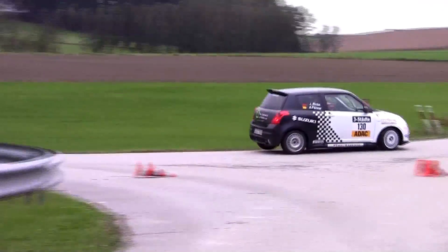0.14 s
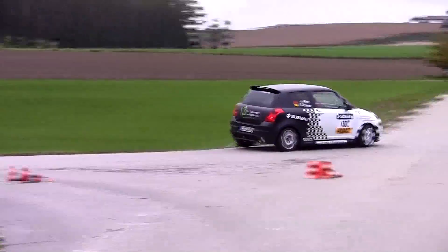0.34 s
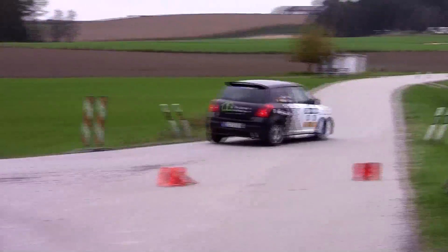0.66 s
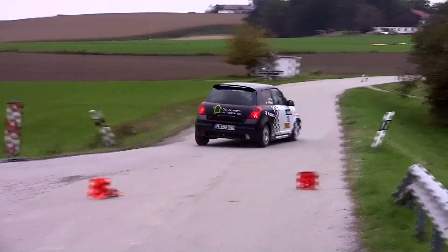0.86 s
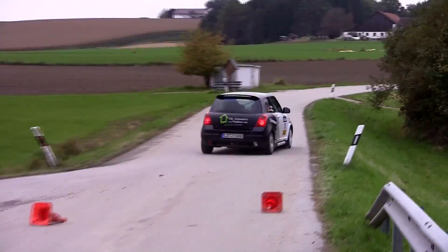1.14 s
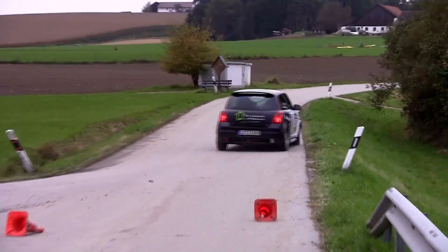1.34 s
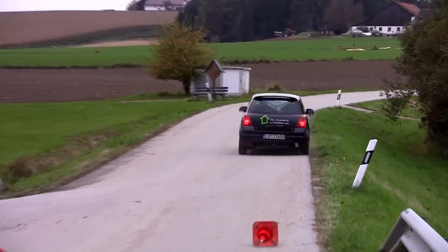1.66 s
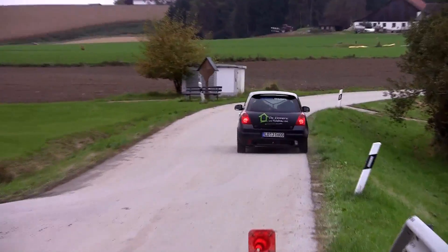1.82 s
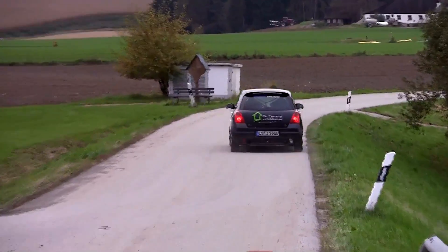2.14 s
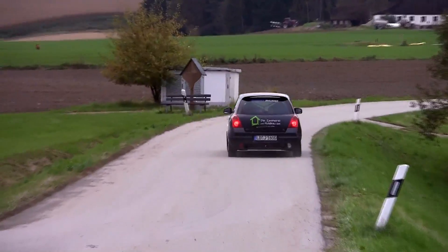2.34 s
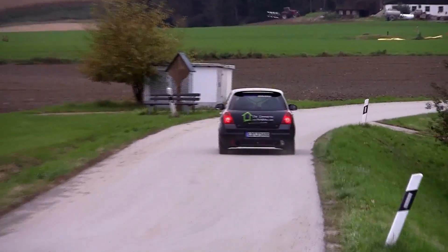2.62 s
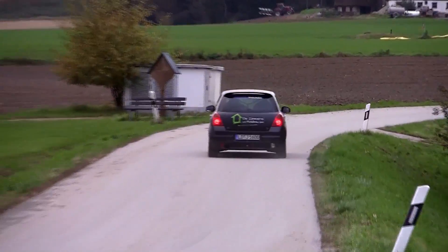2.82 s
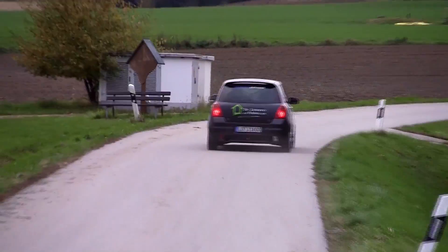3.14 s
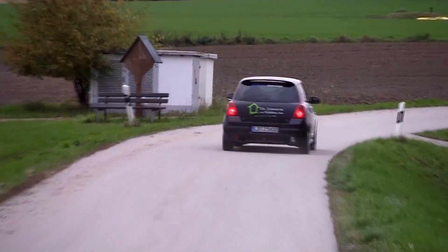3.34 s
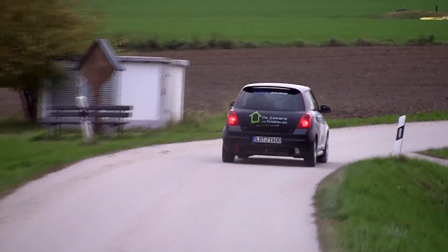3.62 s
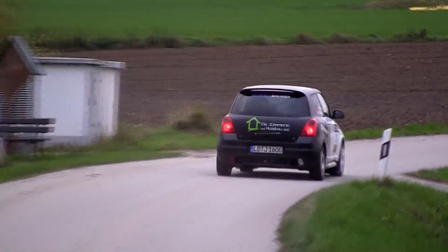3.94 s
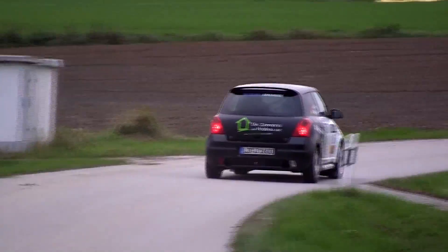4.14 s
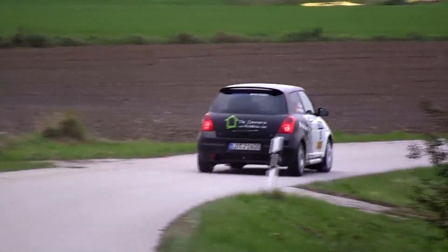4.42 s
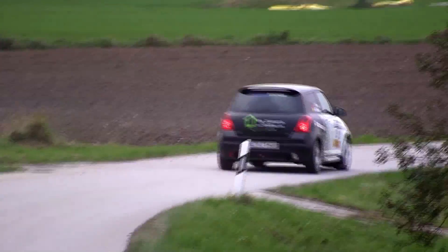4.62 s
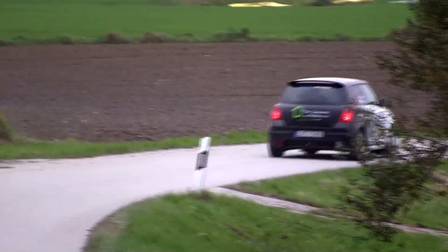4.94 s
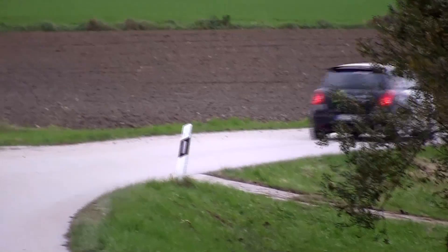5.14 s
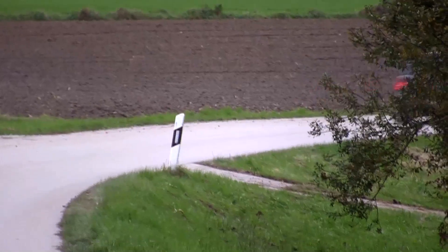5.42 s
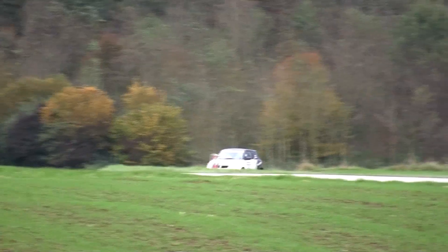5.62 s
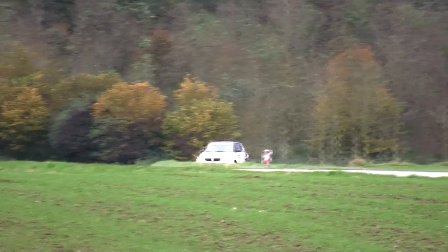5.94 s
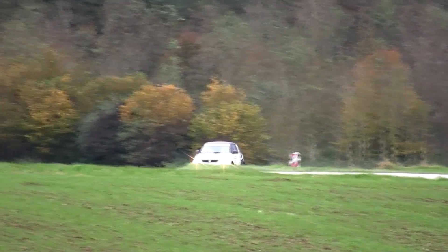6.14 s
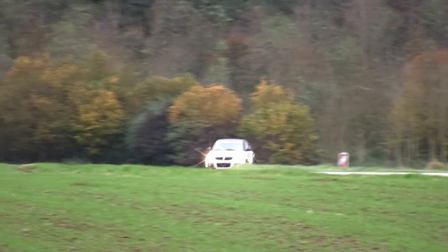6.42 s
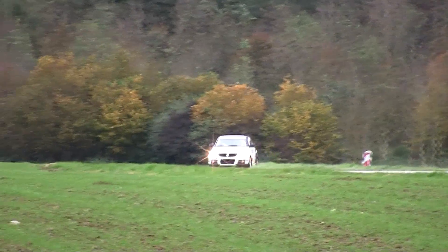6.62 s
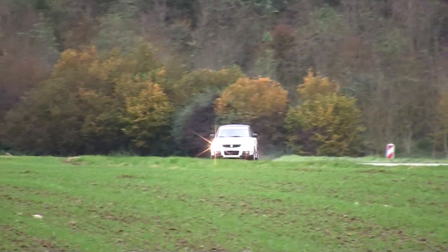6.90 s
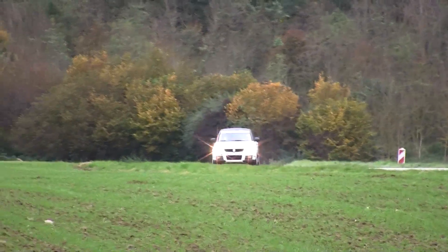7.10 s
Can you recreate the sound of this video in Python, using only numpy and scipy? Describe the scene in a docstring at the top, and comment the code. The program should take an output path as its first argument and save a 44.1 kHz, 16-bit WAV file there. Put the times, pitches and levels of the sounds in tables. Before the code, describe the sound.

A small rally car scrubs through a bend over gravel, then accelerates away in one gear with a raspy roar, before cutting to a quiet field hum.

```python
"""A junction seen from the verge: a small four-cylinder rally car pulls away in one gear.
Firing orders ring through exhaust resonances, with rasp, uneven cylinders and puffed gas noise.
Shaped noise makes the tyres, gravel and wind; short noise cracks are stones flung by the tyres.
The scene then changes to a quiet field: another car far away, a steady hum, low wavering and
sinking tones, all made of sines, over a bed of road noise and air."""
import sys
import numpy as np
from scipy import signal
from scipy.fft import rfft, irfft, next_fast_len
from scipy.io import wavfile
from scipy.ndimage import uniform_filter1d, minimum_filter1d, map_coordinates

SR = 44100
rng = np.random.default_rng(int(sys.argv[2]) if len(sys.argv) > 2 else 0)


def dump(signal):
    """Clip the signal to [-1, 1] and save it as 16-bit WAV at the path in sys.argv[1]."""
    limited = np.clip(np.atleast_2d(signal).T, -1, 1)
    pcm = np.round(limited * 32767).astype(np.int16)
    wavfile.write(sys.argv[1], SR, pcm)


N = 320607

# Noise spectra, by relative density: [frequency_hz, density_db]
FIELD_SPECTRUM = [(15, -34), (60, -12.5), (150, -8), (210, -9), (330, -21.5), (480, -20.5), (680, -16),
                  (1050, -18.5), (1550, -23.5), (2100, -32), (3100, -28.5), (4800, -40), (7700, -47.5),
                  (15800, -53.5)]  # far road noise and air
WIND_SPECTRUM = [(15, -0.5), (30, -16), (80, -2.5), (130, 1), (250, -38)]
TYRE_SPECTRUM = [(700, -22), (1500, 1), (2100, -3), (2650, 1.5), (3300, -7.5), (4600, -9), (6000, -13.5),
                 (7700, -21.5), (9300, -22), (11200, -31), (15800, -39.5)]
GRAVEL_SPECTRUM = [(150, -18.5), (500, -4.5), (1000, -8), (1900, -6.5), (3100, -13), (4800, -22),
                   (6500, -24.5), (7700, -35.5), (9500, -36.5), (15800, -45)]
SQUEAL_SPECTRUM = [(2300, -27), (2550, -3.5), (2750, 2), (3000, -18.5), (4300, -18.5), (4650, -4),
                   (5100, -23.5)]
GAS_SPECTRUM = [(30, -46.5), (80, -33), (130, -6.5), (220, -5.5), (550, 0), (900, -7), (1400, -10.5),
                (2200, -17), (3200, -27.5), (6000, -48.5)]

# Tones over the field: [start_s, pitch_hz, level_db]
HUM = [(5.62, 96.5, -41), (7.27, 100.3, -39)]
DRONE = [(5.8, 199, -58), (5.85, 201, -37.5), (6.5, 207.4, -32), (7.27, 211.5, -40)]  # wavers
SINKING_TONE = [(5.62, 252, -38), (5.72, 242.2, -39), (5.8, 228.3, -32), (5.9, 217, -47), (5.97, 201, -60)]
# Far engine: [start_s, firing_hz, level_db]
FAR_ENGINE = [(5.62, 226.6, -40.5), (5.8, 224, -48.5), (6.25, 236.1, -43), (6.5, 227.6, -48.5),
              (6.95, 237.4, -47), (7.27, 240.5, -51)]
# Balance of the far engine's firing orders: [order, relative_db]
FAR_ORDERS = [(1, 0), (2, -9.5), (3, -7.5), (4, -6), (5, -6), (6, -14.5)]

# Wind on the microphone: [start_s, level_db]
WIND_LEVEL = [(0, -52), (.33, -51), (.53, -63), (1.4, -52.5), (2.38, -50), (2.68, -63), (3.63, -54.5),
              (3.85, -49), (3.98, -45), (4.6, -38), (5.13, -36.5), (5.62, -34.5)]
# Tyres rolling: [start_s, level_db]
ROLLING_LEVEL = [(0, -43.5), (.4, -46.5), (.85, -52), (1.1, -54), (1.46, -48), (1.85, -41.5), (2.63, -42),
                 (3.1, -46), (3.64, -46.5), (4.33, -36), (4.7, -40), (5.11, -42.5), (5.6, -38.5)]
# Swells, where rise and fall each count 30 dB: [full_s, rise_s, hold_s, fall_s, level_db]
SCRUB_SWELLS = [(.19, .5, .14, .06, -32), (.47, .12, .27, .17, -35), (.92, .2, .03, .18, -33.5)]  # tyres scrubbing in the bend
GRAVEL_SWELL = (.198, .015, .062, .08, -14.5)  # a wheel crunches over loose gravel
SQUEAL_SWELL = (.875, .035, .095, .035, -39)  # a tyre half squeals as it grips

# Loudest stones, before the band gains: [start_s, dull_db, bright_db]
LOUD_STONES = [(.3972, -32.5, -49), (.4285, -25, -48.5), (.4338, -28, -47), (1.7433, -24, -42),
               (1.781, -24, -53.5), (1.8124, -31.5, -44.5), (1.8937, -26.5, -39), (1.941, -26, -46.5),
               (1.9746, -35.5, -35.5), (2.0578, -26.5, -46), (2.0934, -38.5, -41), (2.1889, -31.5, -41),
               (2.2623, -30.5, -39), (2.3556, -31.5, -44.5), (2.4413, -28, -53), (2.5616, -34.5, -55),
               (3.1532, -32.5, -49), (3.1978, -32.5, -44), (3.3544, -31.5, -51), (3.3787, -27, -49.5),
               (3.4012, -33.5, -53.5), (4.118, -27.5, -49.5), (4.4813, -29.5, -43.5), (5.1129, -15, -21.5),
               (5.3427, -34, -54), (5.4587, -28.5, -47.5)]
# Small stones at random, before the band gains: [start_s, end_s, dull_db, bright_db]
STONE_SHOWERS = [(1.663, 1.916, -29, -48), (5.245, 5.596, -35, -56.5)]

# Engine speed, surging twice as the tyres slip and grip, then climbing: [start_s, firing_hz]
REVS = [(0.0, 118.8), (0.06, 115.6), (0.23, 117.1), (0.31, 126.6), (0.42, 135.5), (0.5, 125.6),
        (0.51, 125.5), (0.59, 135.4), (0.66, 128.2), (0.72, 126), (0.8, 125.8), (1.03, 120.5),
        (1.22, 121.6), (1.49, 125.8), (1.6, 128.2), (2.24, 135.7), (3.43, 154.6), (4.54, 173),
        (5.53, 187.8), (5.62, 190.5)]
# Exhaust note: [start_s, level_db, slope above 700 Hz db_per_octave, extra lowest-order level_db]
NOTE = [(0, -9, 1, 20), (.2, -4.5, 3, 18), (.225, -13, 8, 11), (.265, 3, 15, -7), (.42, 4.5, 11, -4),
        (.5, 2, 9.5, -8.5), (.6, 4.5, 5.5, -4), (.8, 2.5, -2, -8), (1.05, -2.5, 7, 1), (1.27, -2, 8.5, -1),
        (1.6, 4.5, -1, -5.5), (2, 4.5, -16, -1), (2.3, 4.5, 0.5, 6), (2.7, 4.5, -1, 5), (3.1, 4.5, -7, 1.5),
        (3.5, 1, -1.5, 2), (3.9, 1.5, 3.5, 2), (4.2, -2.5, 11, 8), (4.5, 1.5, 4.5, 4), (4.8, 0, 3.5, 7.5),
        (5.1, -5.5, 6, 9), (5.35, -0.5, 13.5, 2), (5.62, -5, 19.5, 5.5)]
# Exhaust resonances as heard on the verge: [centre_hz, width_hz, near_db, far_db]
PIPE_MODES = [(127.4, 14.4, -13, -21.5), (195.2, 32.9, 4.5, -12), (265, 24, -27.5, -5.5),
              (343.7, 35.0, -11, -18.5), (477.3, 52.4, -16.5, -11), (543, 11, -33.0, -5.5),
              (594.5, 71.0, -15.5, -12), (702, 89.5, -21, -19.5), (850.7, 87, -31.5, -33),
              (951, 72, -30.5, -43), (1098, 89, -39, -37.5), (1170, 25, -40.5, -33),
              (1268, 112, -43.5, -46), (1430, 86, -67, -69)]
# A resonance that sings on and off: [start_s, centre_hz, level_db]
SINGING = [(0, 1400, -47), (.25, 1390, -44), (.42, 1450, -28), (.5, 1400, -43), (.6, 1430, -30),
           (.8, 1263, -37.5), (1.3, 1248, -41), (1.8, 1194, -34.5), (2.2, 1219, -25), (2.7, 1235, -32),
           (3.1, 1220, -29.5), (3.4, 1092, -30), (3.8, 1254, -33), (4.1, 1158, -33.5), (4.5, 1223, -43.5),
           (5.3, 1114, -32)]
# Harsh exhaust parts: [start_s, lower_rasp_db, upper_rasp_db, gas_roar_db, unevenness_db]
HARSH = [(0, -47, -47, -25.5, -44), (.17, -46, -41, -21.5, -33), (.41, -29.5, -53, -27, -53),
         (.6, -35, -41, -27, -50), (.84, -50, -51, -29.5, -50), (.91, -43, -45, -28.5, -48),
         (1.2, -47, -52, -35, -53), (1.9, -37.5, -43, -32, -40.5), (2.15, -39, -43, -28, -37),
         (2.3, -46, -32, -28.5, -40), (2.85, -33.5, -28.5, -26, -41.5), (3.25, -49.5, -41.5, -29, -35),
         (3.7, -34, -40.5, -25.5, -35.5), (4.3, -39.5, -43, -22.5, -25), (4.75, -38, -38, -28, -30),
         (4.9, -37.5, -38, -24, -31.5), (5.2, -30.5, -39.5, -24.5, -37.5), (5.62, -33, -41, -23.5, -47)]
# Tailpipe resonances behind the rasp: [centre_hz, width_hz]
RASP_MODES = [(1720, 260), (2060, 260), (2800, 800)]
# Highest rasp resonance against the middle one: [start_s, relative_db]
TOP_RASP = [(0, -16), (2, -30), (3.1, -30), (4, -10), (5.62, -5)]
# Unevenness of the cylinders: [shaft_order, relative_db]
UNEVEN_ORDERS = [(1, -21.5), (3, 0), (5, -6.5), (7, -6), (9, -19.5), (11, -27.5), (13, -27.5), (15, -18),
                 (17, -31), (19, -30)]
# Pulse shape, changing early on: [start_s, phase_rad, spread_cycles]
PULSE_SMEAR = [(0, .4, .7), (.21, .4, .7), (.25, 2.4, .37), (.9, 2.4, .38), (1.4, 2.1, .4)]
# Air between car and verge shaking the top orders; also scales their flicker: [start_s, blur_rad]
AIR_BLUR = [(0, .15), (3.2, .2), (4, .6), (5.6, .8)]

CHANGE_S, FADE_S = 5.624, .006  # the place has changed by CHANGE_S
TOP_HZ = 15800
STONE_T60_S, STONE_ATTACK_S = 0.018, 0.00089
FAR_S = 5.6  # the car takes this long to go from near to far
SING_WIDTH_HZ = 300
FADING_DB_PER_ORDER, FLICKER_DB_PER_ORDER = .24, .45  # higher orders waver and flicker more


def amp(db):
    """Gain of a level in dB."""
    return 10 ** (np.asarray(db) / 20)


def unit(x):
    """x at rms 1."""
    return x / np.sqrt(np.mean(x ** 2) + 1e-20)


def curves(rows):
    """One value per sample for each column after the time."""
    s, *columns = np.transpose(rows)
    return [np.interp(np.arange(N) / SR, s, column) for column in columns]


def wobble(rate):
    """A smooth random curve, rate knots a second."""
    knots = rng.standard_normal(int(N * rate / SR) + 4)
    return map_coordinates(knots, [np.arange(N) * rate / SR])


def filtered(x, response):
    """x times a response of frequency."""
    size = next_fast_len(N + 8192)
    return irfft(rfft(x, size) * response(np.fft.rfftfreq(size, 1 / SR)), size)[:N]


def rush(spectrum, patchy_db):
    """Noise of rms 1 whose time-frequency patches have random gain."""
    grains = signal.stft(rng.standard_normal(N), nperseg=512)[2]
    patches = uniform_filter1d(rng.standard_normal(grains.shape), size=10, axis=1)
    patches = uniform_filter1d(patches, size=5, axis=0)
    noise = signal.istft(grains * amp(patchy_db * unit(patches)), nperseg=512)[1][:N]
    f, db = np.transpose(spectrum)
    shape = lambda hz: amp(np.interp(np.log(hz + 1), np.log(f), db, -120, -120))
    return unit(filtered(noise, shape))


def resonance(hz, mode):
    """Complex response of one mode, 1 at its centre."""
    centre, width = mode
    return 1j * hz * width / (centre ** 2 - hz ** 2 + 1j * hz * width)


def tone(hz, db, drift):
    """A sine whose phase is pushed about by the air on the way."""
    return np.sqrt(2) * amp(db) * np.sin(2 * np.pi * np.cumsum(hz) / SR + drift)


def swell(s, rise, hold, fall, db):
    """Gain that rises, holds and falls, straight in dB."""
    edges = s + np.array([-2 * rise, 0, hold, hold + 2 * fall])
    return amp(db + np.interp(np.arange(N) / SR, edges, [-60, 0, 0, -60]))


def field_air():
    """Far road noise and air: shaped noise with a slightly unsteady level."""
    return amp(-38 + .6 * wobble(7.4)) * rush(FIELD_SPECTRUM, patchy_db=0.0)


def field_tones():
    """Hum, drone and sinking tone: sines with wandering phase; hum and drone waver in level too."""
    hum_hz, hum_db = curves(HUM)
    hum = tone(hum_hz, hum_db + 1.7 * wobble(45) + 1.6 * wobble(5.5), drift=0.56 * wobble(12))
    drone_hz, drone_db = curves(DRONE)
    drone = tone(drone_hz, drone_db + 2.4 * wobble(20), drift=0.7 * wobble(23))
    return hum + drone + tone(*curves(SINKING_TONE), drift=1.0 * wobble(21))


def far_car():
    """The far engine's firing orders, blurred by moving air, the higher the more."""
    firing_hz, level_db = curves(FAR_ENGINE)
    return sum(tone(k * firing_hz, level_db + db + 3.5 * wobble(16), drift=.5 * k * wobble(30))
               for k, db in FAR_ORDERS)


def wind():
    """Wind rumbles on the microphone: low noise with a drifting level."""
    level_db, = curves(WIND_LEVEL)
    return amp(level_db + 0.84 * wobble(8)) * rush(WIND_SPECTRUM, patchy_db=1.0)


def tyres():
    """Rolling and scrubbing noise flutters and crackles with grit; gravel crunch and half squeal."""
    grip = amp(curves(ROLLING_LEVEL)[0]) + sum(swell(*row) for row in SCRUB_SWELLS)
    flutter = amp(0.83 * wobble(30) + 1.0 * wobble(180))
    rolling = grip * flutter * rush(TYRE_SPECTRUM, patchy_db=1.0)
    gravel = swell(*GRAVEL_SWELL) * amp(1.2 * wobble(250)) * rush(GRAVEL_SPECTRUM, patchy_db=.6)
    squeal = swell(*SQUEAL_SWELL) * amp(3 * wobble(90)) * rush(SQUEAL_SPECTRUM, patchy_db=3.0)
    return rolling + gravel + squeal


def shower(start, end, dull_db, bright_db, count=8):
    """Small stones at random moments, of scattered strength."""
    when, strength_db = rng.random(count), 3 * rng.standard_normal(count)
    return [(start + u * (end - start), dull_db + db, bright_db + db)
            for u, db in zip(when, strength_db)]


def stones():
    """Each stone striking the bodywork is a crack of a few ms with a dull and a bright part."""
    dull, bright, t = np.zeros(N + SR), np.zeros(N + SR), np.arange(1500) / SR
    envelope = amp(-60 * t / STONE_T60_S) * (1 - np.exp(-t / STONE_ATTACK_S))
    small = [stone for row in STONE_SHOWERS for stone in shower(*row)]
    for s, dull_db, bright_db in list(LOUD_STONES) + small:
        crack = envelope * rng.standard_normal((2, len(t)))
        dull[round(s * SR):][:len(t)] += crack[0] * amp(dull_db)
        bright[round(s * SR):][:len(t)] += crack[1] * amp(bright_db)
    dull = filtered(dull[:N], lambda hz: resonance(hz, (3600, 5500)) ** 3)
    bright = filtered(bright[:N], lambda hz: resonance(hz, (8800, 5000)) ** 3)
    return amp(6.5) * dull + amp(9.5) * bright


def gas_roar(turns, level_db):
    """Gas noise puffed out once a firing."""
    puff = 1 + .3 * np.cos(2 * np.pi * turns)
    return amp(level_db) * unit(puff * rush(GAS_SPECTRUM, patchy_db=1.1))


def uneven_cylinders(order, level_db):
    """Unequal cylinders add odd shaft orders, at half-steps of the firing rate."""
    return sum(amp(level_db + db + 0.77 * wobble(8.3)) * order(k / 2) for k, db in UNEVEN_ORDERS)


def exhaust_rasp(firing_hz, order, blur, lower_db, upper_db):
    """High firing orders through the tailpipe resonances, their phases scattered by the air."""
    levels_db = [lower_db, upper_db, upper_db + curves(TOP_RASP)[0]]
    rasp = 0
    for k in range(9, 22):
        fading_db = 2 * wobble(4)  # ground and hedge echoes make the top orders come and go
        pipe = sum(amp(db) * abs(resonance(k * firing_hz, mode)) ** 2
                   for db, mode in zip(levels_db, RASP_MODES))
        scatter = 1.2 * wobble(3) + blur * wobble(40)
        rasp += amp(fading_db - 5) * pipe * order(k, scatter)
    return rasp


def exhaust_note(firing_hz, order, blur):
    """The low firing orders, each loud while it passes an exhaust resonance."""
    level_db, slope_db, boom_db = curves(NOTE)
    sing_hz, sing_db = curves(SINGING)
    far = np.clip(np.arange(0, N, 64) / SR / FAR_S, 0, 1)  # resonances are worked out every 64 samples
    note = 0
    for k in range(1, 13):
        power = 0
        for hz, width, near_db, far_db in PIPE_MODES:
            mode_gain = amp(near_db + far * (far_db - near_db))
            power += (mode_gain * abs(resonance(k * firing_hz[::64], (hz, width))) ** 2) ** 2
        tilt_db = slope_db * np.log2(np.maximum(k * firing_hz / 700, 1)) + boom_db * (k == 1)
        body = np.repeat(np.sqrt(power), 64)[:N] * amp(level_db + tilt_db)
        sing = amp(sing_db) * abs(resonance(k * firing_hz, (sing_hz, SING_WIDTH_HZ))) ** 2
        fading_db = FADING_DB_PER_ORDER * wobble(3.983)
        flicker_db = FLICKER_DB_PER_ORDER * blur * (k > 1) * wobble(13)  # the air shakes them
        note += np.hypot(body, sing) * amp(k * (fading_db + flicker_db)) * order(k)
    return note


def near_car():
    """Firing orders in step make a pulse train, joined by rasp, unevenness and gas roar."""
    firing_hz, = curves(REVS)
    blur, = curves(AIR_BLUR)
    lower_db, upper_db, roar_db, uneven_db = curves(HARSH)
    start, spread = curves(PULSE_SMEAR)
    turns = np.cumsum(firing_hz) / SR + 0.0055 * wobble(45)  # firings so far, a little early or late

    def order(k, scatter=0):
        """One firing order at rms 1; lows leave the pipe later than highs."""
        lag = start - 2 * np.pi * spread * np.log(k * firing_hz / 500)
        return np.sqrt(2) * np.cos(2 * np.pi * k * turns + lag + scatter)

    pulses = exhaust_note(firing_hz, order, blur)
    pulses = pulses + exhaust_rasp(firing_hz, order, blur, lower_db, upper_db)
    pulses *= amp(0.21 * wobble(70))  # firing strength varies
    return pulses + uneven_cylinders(order, uneven_db) + gas_roar(turns, roar_db)


def scene():
    """The verge, then a short crossfade to the field."""
    verge = np.clip((CHANGE_S - np.arange(N) / SR) / FADE_S, 0, 1)
    field = field_air() + field_tones() + far_car()
    roadside = wind() + tyres() + stones() + near_car()
    return (verge * roadside + (1 - verge) * field)[None]


def record(dry):
    """A fast limiter holds peaks at full scale, then everything above the band limit is removed."""
    needed = np.minimum(1, 1 / (abs(dry[0]) + 1e-9))
    gain = uniform_filter1d(minimum_filter1d(needed, size=177), size=88)
    return filtered(dry[0] * gain, lambda hz: hz < TOP_HZ)[None]


dry = scene()
out = record(dry)
dump(out)
```